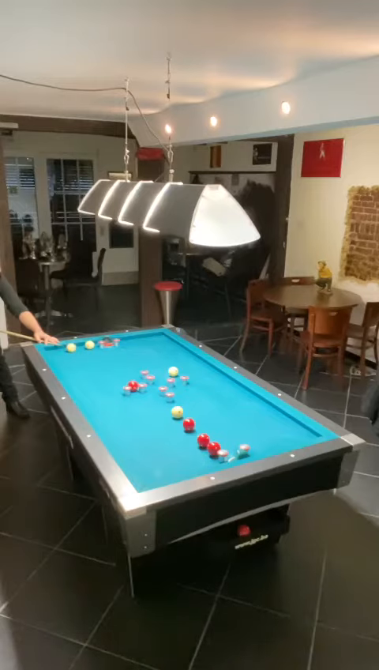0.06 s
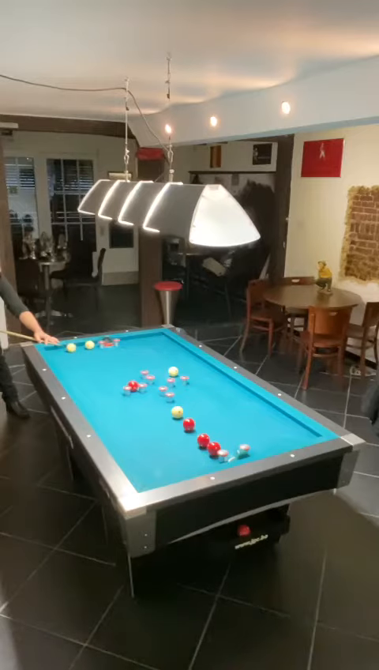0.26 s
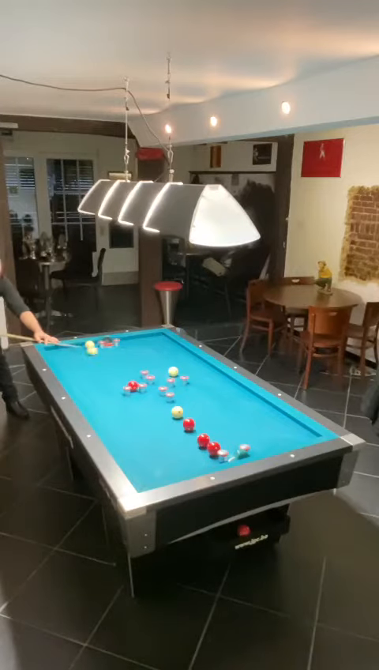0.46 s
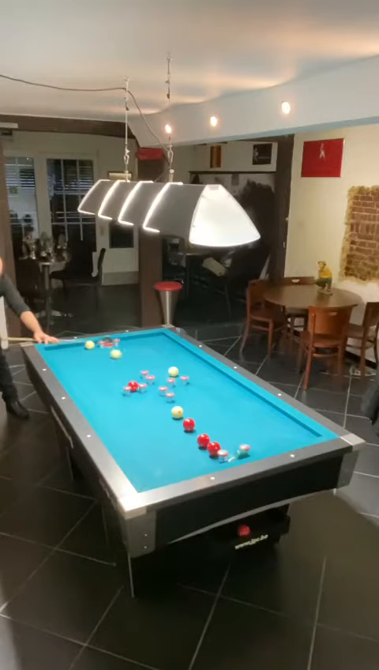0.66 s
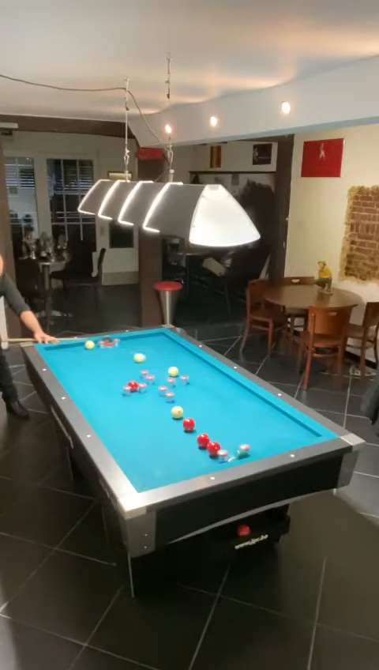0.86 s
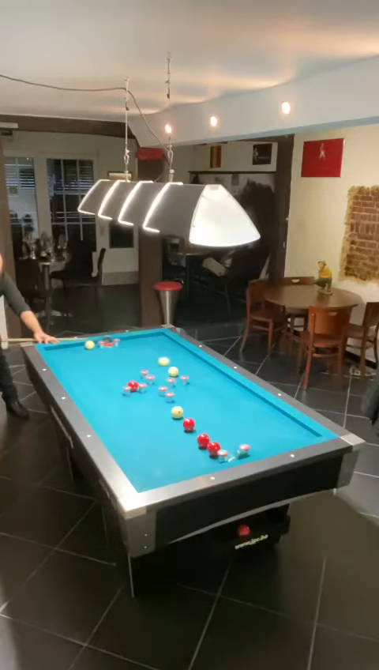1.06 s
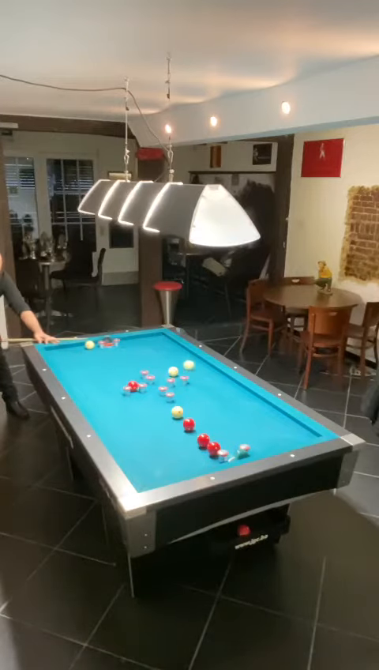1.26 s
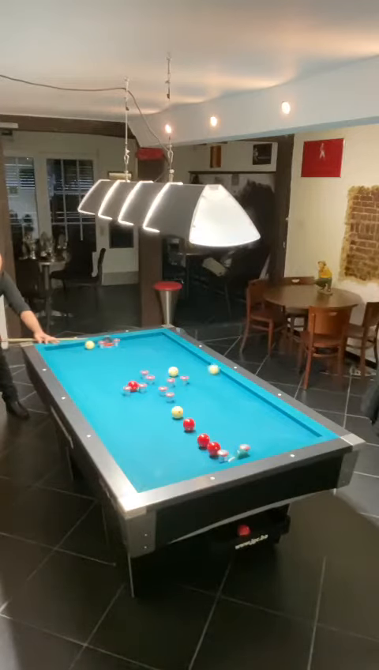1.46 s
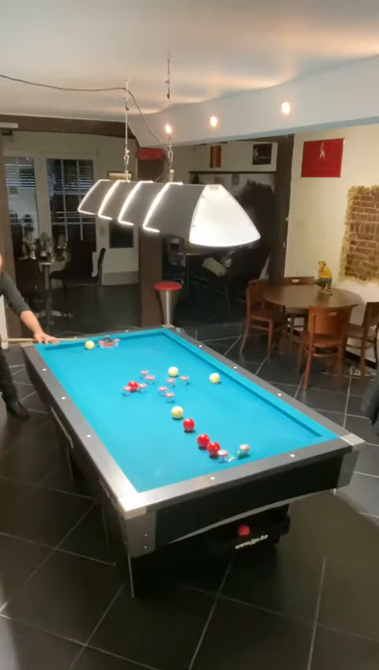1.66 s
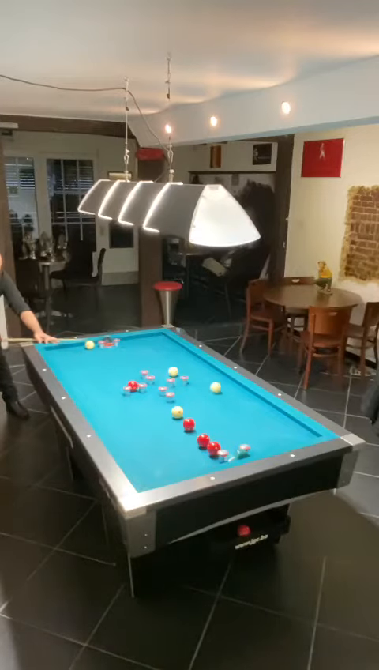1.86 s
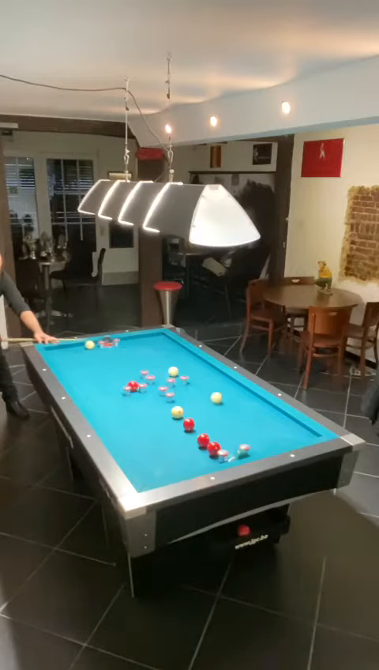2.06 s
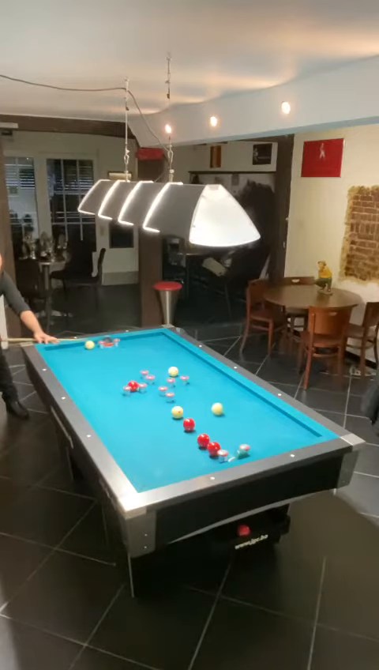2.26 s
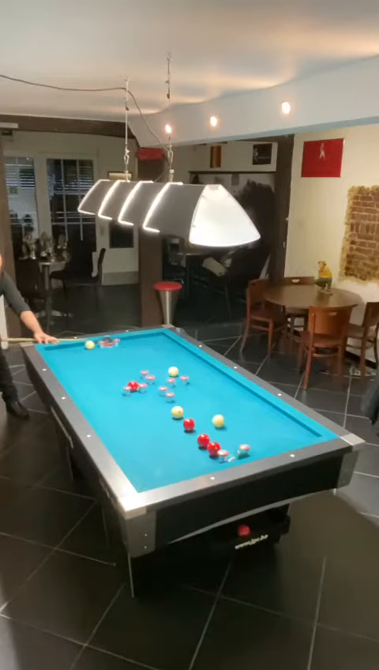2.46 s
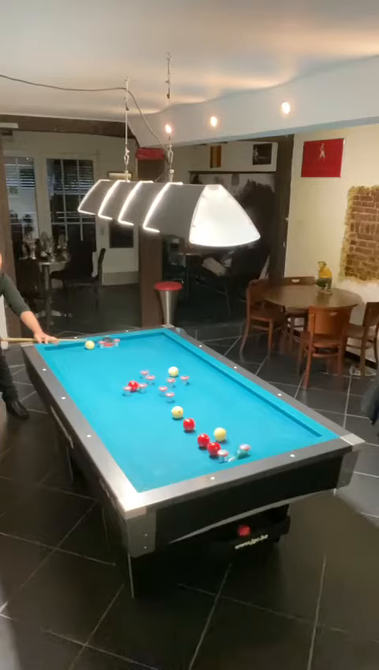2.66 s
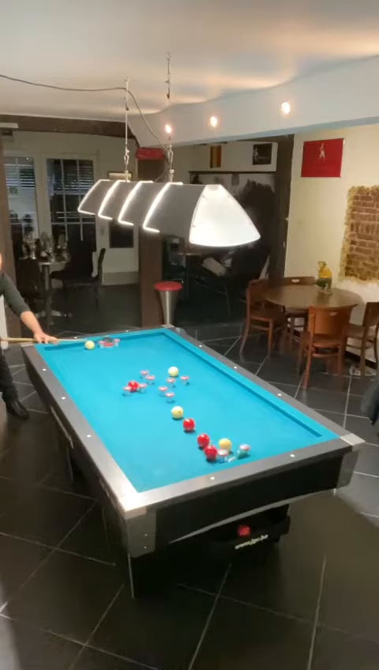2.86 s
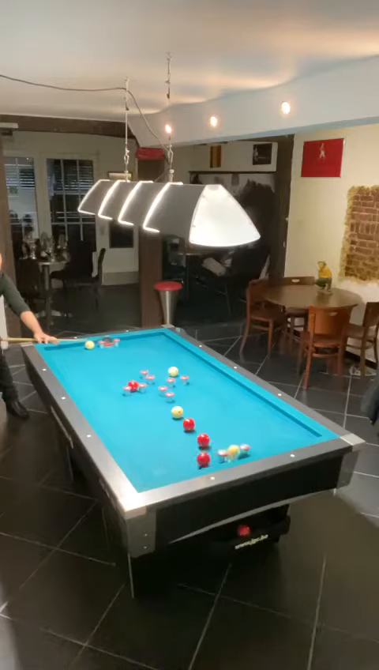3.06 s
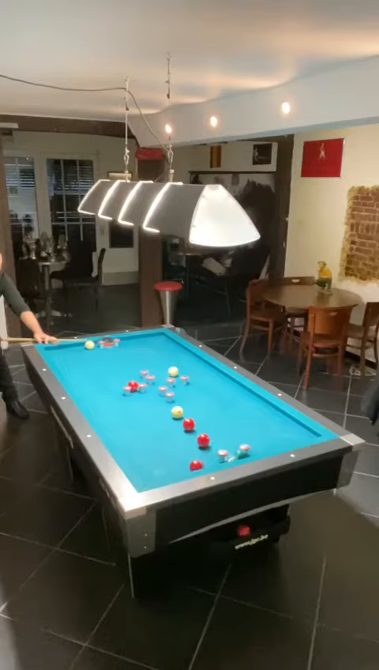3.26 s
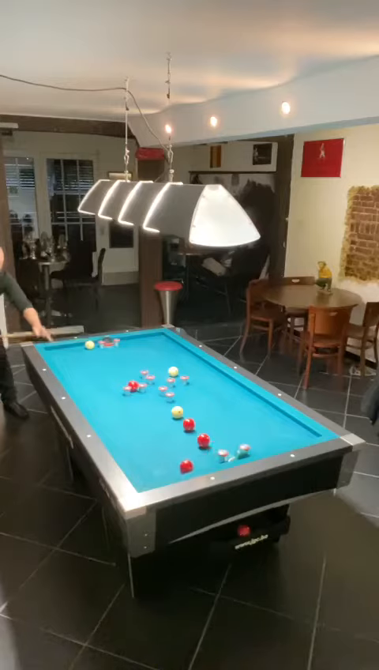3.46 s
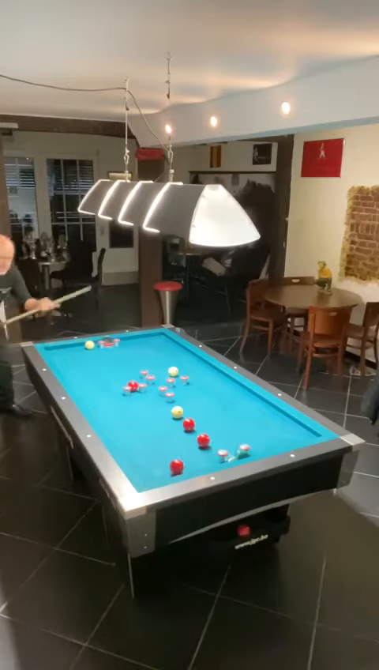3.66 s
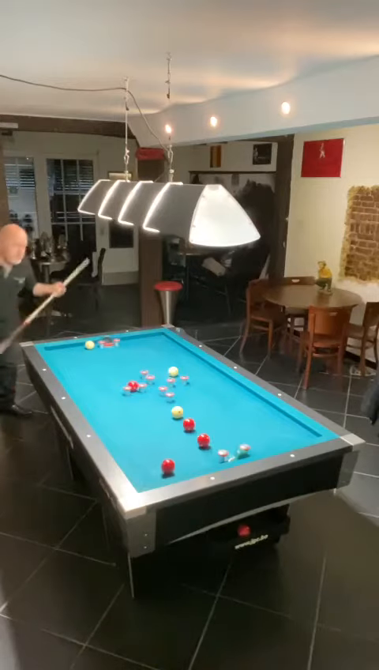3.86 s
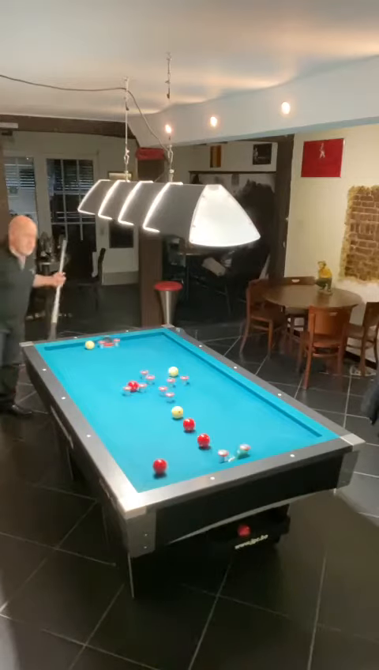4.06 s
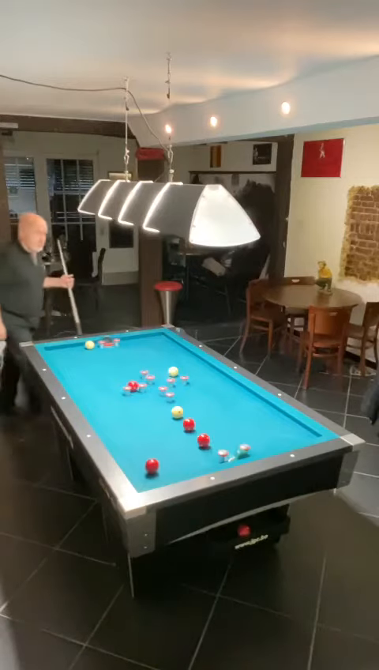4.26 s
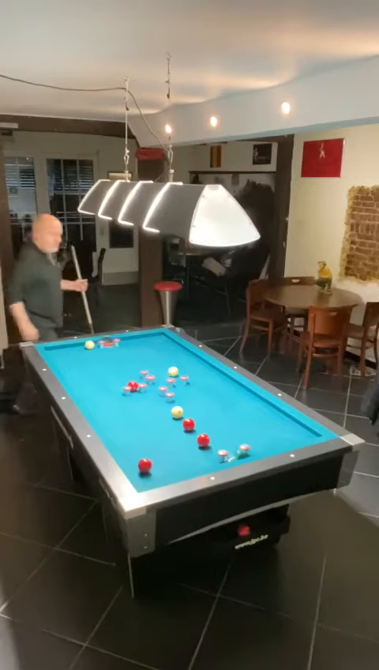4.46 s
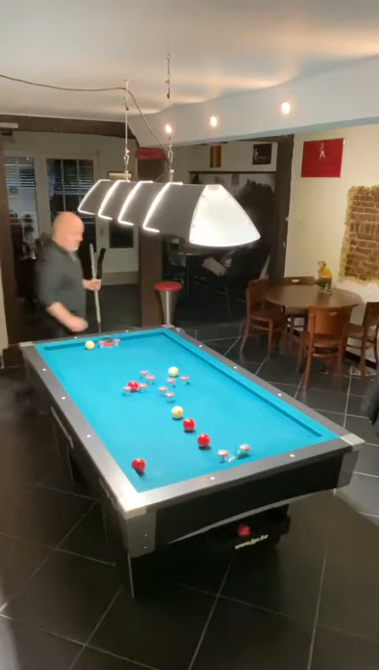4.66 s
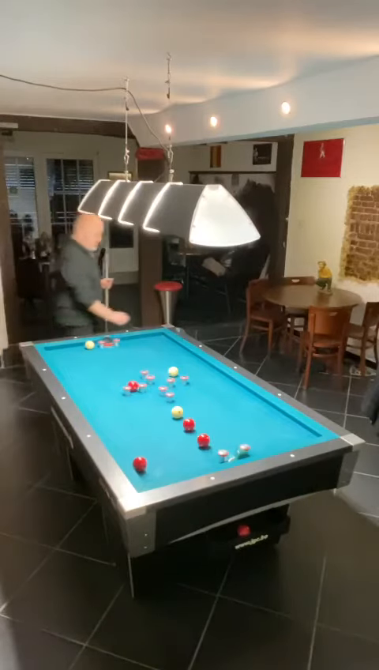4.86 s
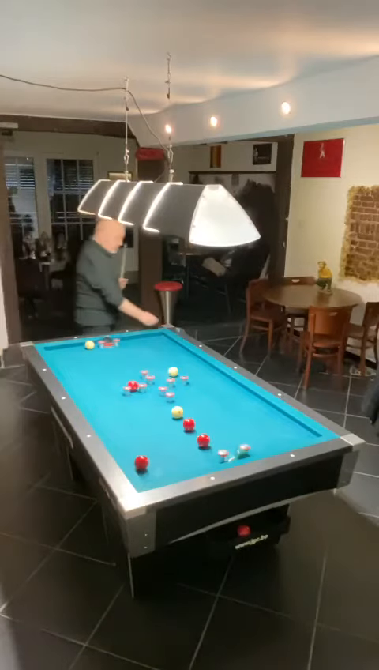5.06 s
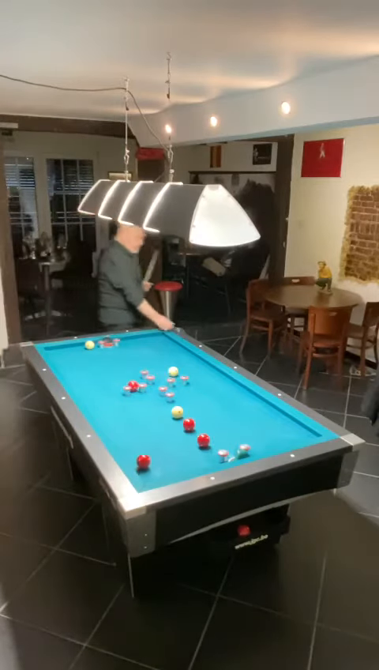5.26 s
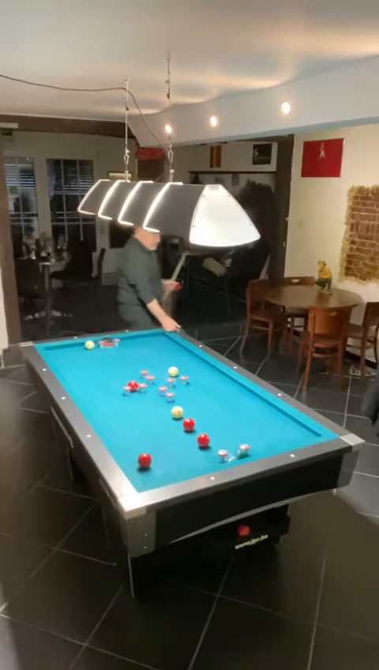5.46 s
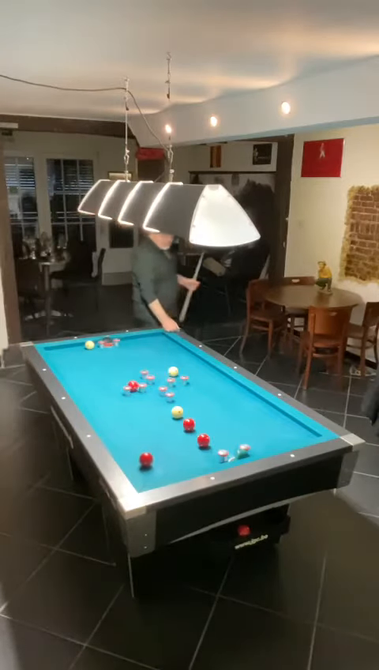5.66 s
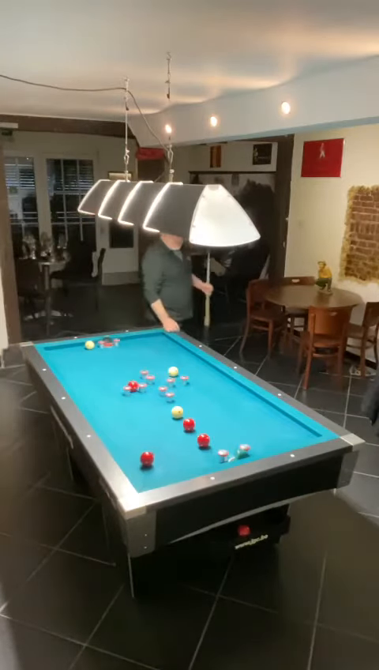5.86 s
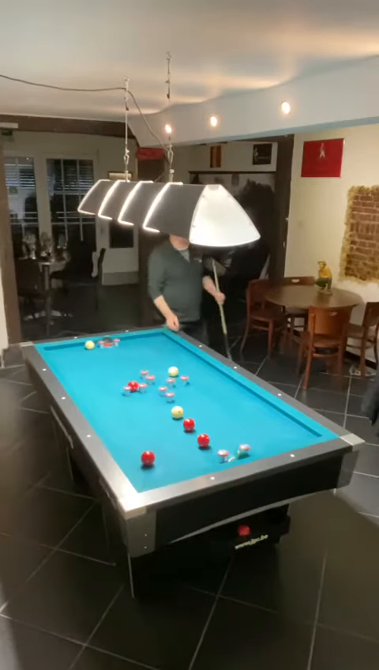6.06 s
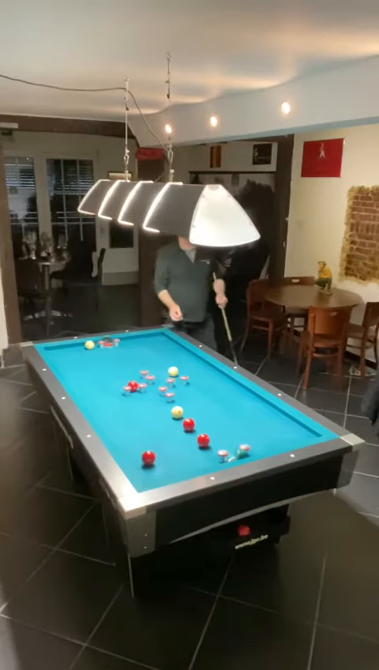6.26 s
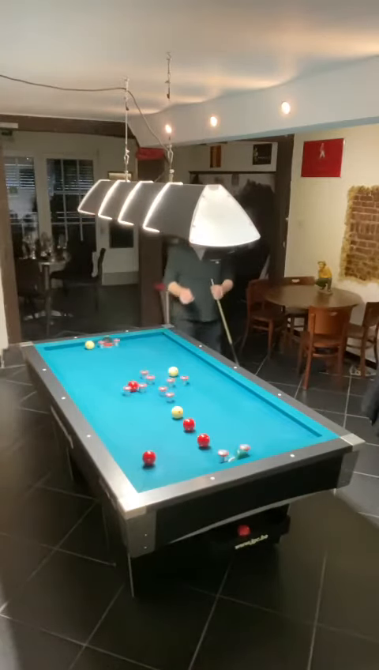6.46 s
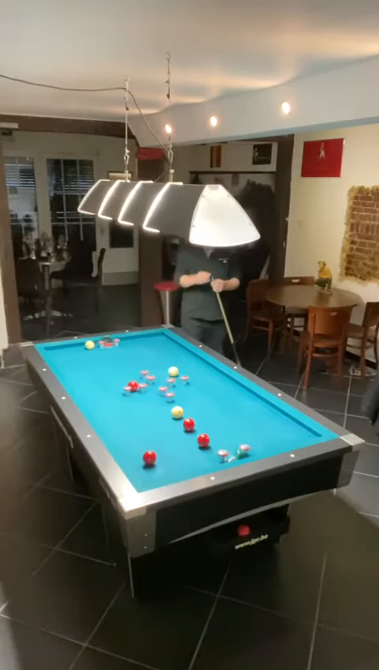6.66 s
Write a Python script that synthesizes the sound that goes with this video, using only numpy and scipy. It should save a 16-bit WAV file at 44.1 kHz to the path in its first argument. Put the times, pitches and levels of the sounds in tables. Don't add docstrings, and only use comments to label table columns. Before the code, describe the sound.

In a reverberant tiled room, a pool shot ends with a click, a pocket drop, a hollow wooden roll and a clattering tray collision.

```python
import sys
import numpy as np
from scipy import signal
from scipy.fft import rfft, irfft
from scipy.io import wavfile
from scipy.ndimage import uniform_filter1d

SR = 44100
rng = np.random.default_rng(int(sys.argv[2]) if len(sys.argv) > 2 else 0)


def wav_record(signal):
    frames = np.transpose(np.atleast_2d(signal))
    bounded = np.clip(frames, -1, 1)
    quanta = np.round(bounded * 32767).astype(np.int16)
    wavfile.write(sys.argv[1], SR, quanta)


def natural_amplitude(level_db):
    exponent = np.asarray(level_db, float) / 20
    return 10 ** exponent


N = 296219
JAW_S, DROP_S = 3.1315, 3.2572


def rms_one(x):
    return x / np.sqrt(np.mean(x ** 2) + 1e-20)


def in_time(rows):
    s, *columns = np.transpose(rows)
    return [np.interp(np.arange(N) / SR, s, column) for column in columns]


def at_hz(points, hz):
    table = np.array(points)
    return np.interp(np.log(hz), np.log(table[:, 0]), table[:, 1])


def drift(rate):
    step = 40
    r = np.exp(-2 * step * np.pi * rate / SR)
    white = rng.standard_normal(N // step + 2002)
    slow = signal.lfilter([1], [1, -2 * r, r * r], white)[2000:]
    return np.interp(np.arange(N) / step, np.arange(len(slow)), rms_one(slow))


def strikes(events, spread_db=0.):
    rows, out = np.array(events), np.zeros(N)
    out[np.round(rows[:, 0] * SR).astype(int)] = natural_amplitude(rows[:, 1] + spread_db)
    return out


def swells(rows, rise_s, fall_db_per_s, hold_s=0.):
    t, out = np.arange(N) / SR, 0
    for (s, db, *_), rise in zip(rows, np.broadcast_to(rise_s, len(rows))):
        climb_db = 40 * np.clip(s - t, 0, None) / rise
        decay_db = fall_db_per_s * np.clip(t - s - hold_s, 0, None)
        out = out + natural_amplitude(db - climb_db - decay_db)
    return out


def ring(x, hz, t60):
    r, w = natural_amplitude(-60 / (t60 * SR)), 2 * np.pi * hz / SR
    return signal.lfilter([0, np.sin(w)], [1, -2 * r * np.cos(w), r * r], x + 1e-18)


def coloured(x, spectrum):
    size = 8192
    level = at_hz(spectrum, np.arange(size // 2 + 1) * SR / size + 1)
    cepstrum = irfft(np.maximum(level, -90) * np.log(10) / 20)
    cepstrum[1:size // 2] *= 2
    cepstrum[size // 2 + 1:] = 0
    pulse = irfft(np.exp(rfft(cepstrum)))[:size // 2]
    return signal.fftconvolve(x, pulse / np.abs(pulse).max())[:N]


def bumps(per_s, uneven_db):
    unevenness = np.minimum(rng.exponential(1, N), 5)
    sizes = natural_amplitude(uneven_db * unevenness) * rng.choice([-1, 1], N)
    return rms_one(sizes * (rng.random(N) < per_s / SR))


# f/Hz, correlation/1
LIKENESS = [(300, 1), (500, 0.69), (1000, 0.45), (2000, -0.044), (4000, -0.17), (8000, 1), (11000, -0.54)]
# f/Hz, left minus right level/dB
BALANCE_DB = [(250, 0), (500, 1.6), (1000, 1.7), (2000, .3), (10000, .3)]


def bands(length, gain):
    out, edges = 0, 22 * 2 ** np.arange(0, 9.6, .5)
    white = rng.standard_normal((2, 2, length))
    opposite = np.array([[1], [-1]])
    for k, (low, high) in enumerate(zip(edges, edges[1:])):
        band = signal.butter(2, [low, high], "band", fs=SR, output="sos")
        mid, side = signal.sosfilt(band, white[k % 2])
        hz = np.sqrt(low * high)
        alike = np.clip(at_hz(LIKENESS, hz), -1, 1)
        lean = natural_amplitude(at_hz(BALANCE_DB, hz) / 2 * opposite)
        stereo = np.sqrt(1 + alike) * mid + np.sqrt(1 - alike) * side * opposite
        out = out + gain(hz) * lean * stereo
    return out


# f/Hz, T60/s
ROOM_T60 = [(60, 0.85), (200, 1.45), (500, 1.07), (1200, 1.07), (2500, 1.16), (5000, 0.81), (10000, 0.35)]
# t/s, level/dB
WALLS = [
    (0.0169, -3.5),
    (0.029, -9),
    (.048, -26),
]


def room(x, open_air):
    t = np.arange(round(1.5 * SR)) / SR
    tail = bands(len(t), lambda hz: natural_amplitude(-60 * t / at_hz(ROOM_T60, hz)))
    tail = natural_amplitude(-29.5) * tail * (1 - np.exp(-t / 0.00057))
    out = signal.fftconvolve((x + open_air)[None], tail, axes=1)[:, :N]
    for s, db in WALLS:
        delay = round(s * SR)
        out += natural_amplitude(db) * np.array([np.roll(open_air, delay), np.roll(open_air, delay + 6)])
    return out


# f/Hz, spectral density level/dB
AIR = [(76, -43.5), (130, -5.5), (258, -7), (295, -12.5), (379, -18), (409, -7.5), (482, -6.5), (662, -14),
       (722, -12), (795, -13), (1300, -22), (1690, -52.5), (2860, -120)]
# f/Hz, spectral density level/dB
HISS = [(700, -18.5), (1300, -6), (1900, -6), (2500, 0), (2900, -3), (3600, -9.5), (4300, -15), (4700, -19),
        (5000, -35.5), (8000, -29.5), (11000, -34)]
# f/Hz, spectral density level/dB
DEEP = [(12, -63.5), (20, -13), (48, 6.5), (103, 10.5), (130, -16.5), (150, 8), (200, -11), (330, -120)]
# t/s, level/dB
BOOMS = [
    (.36, -43.5),
    (.58, -50),
    (1.52, -53),
    (2.52, -60),
    (2.83, -54.5),
    (5.39, -39),
    (5.53, -45.5),
    (6.0, -52.5),
    (6.3, -70),
]


def ventilation():
    air_db, hiss_db, traffic_db = -54.5, -63.5, -62.5
    whine_hz, whine_db = 8330, -93
    t = np.arange(N) / SR
    on_cloth = 1. * (t > 0.22) * (t < 2.39)
    cloth = natural_amplitude(-57) * uniform_filter1d(on_cloth, size=4000)
    boom = natural_amplitude(traffic_db) + cloth + swells(BOOMS, 0.12, 78)
    air = [rms_one(coloured(rng.standard_normal(N), AIR)) for _ in range(2)]
    hiss = [rms_one(coloured(rng.standard_normal(N), HISS)) for _ in range(2)]
    mid = natural_amplitude(air_db + 0.4 * drift(6)) * air[0] + natural_amplitude(hiss_db) * hiss[0]
    side = natural_amplitude(air_db - 6.5) * air[1] + natural_amplitude(hiss_db + 1.5) * hiss[1]
    deep = boom * natural_amplitude(1.02 * drift(2.2)) * rms_one(coloured(rng.standard_normal(N), DEEP))
    whine = natural_amplitude(whine_db) * np.sin(2 * np.pi * whine_hz * t)
    return mid + side * [[1], [-1]] + deep + whine


# f/Hz, spectral density level/dB
SCUFF_COLOUR = [(1760, -42), (3000, 1), (4570, -6.5), (5320, -8.5), (5790, -7), (7850, -8), (10400, -15.5),
                (11500, -40.5), (15000, -57), (22000, -120)]
# t/s, level/dB, rise/s
SHUFFLE = [
    (5.62, -50.5, 0.053),
    (6.0, -88, 0.12),
    (6.37, -60.5, 0.26),
]


def scuffs():
    skid = swells([(DROP_S + 0.019, -38)], .02, 75)
    ball = skid + natural_amplitude(-37.5) * rolling()[0]
    walking = np.arange(N) / SR > SHUFFLE[0][0]
    player = swells(SHUFFLE, np.array(SHUFFLE)[:, 2], 79) + natural_amplitude(-75.5) * walking
    rub = bands(N, lambda hz: natural_amplitude(at_hz(SCUFF_COLOUR, hz)) * (hz > 2800))
    flutter = natural_amplitude(1.3 * drift(14))
    rub = signal.sosfilt(signal.butter(8, 10400, fs=SR, output="sos"), rub)
    return (ball + player) * natural_amplitude(3.0) * flutter * rms_one(rub)


# t/s, peak level/dB
CUE = [
    (0.2862, -21),
]
# f/Hz, level/dB, T60/s
CUE_MODES = [(501, -34, 0.9), (590, -28, 5.0), (743, -6, 2.2), (916, -10, 0.45), (1148, -3, 0.038),
             (1654, -10.5, 0.29), (2250, -12.5, 1.2), (2547, -8, 5.0)]
# f/Hz, spectral density level/dB
CUE_COLOUR = [(35, -30), (60, -19), (308, -9), (592, -6.5), (804, -13), (916, 0), (999, -12.5), (2340, -18),
              (2910, -30), (3320, -25.5), (11000, -53), (14300, -68), (22000, -120)]


def cue():
    blow = strikes(CUE)
    shaft = sum(natural_amplitude(db - 14.5) * ring(blow, hz, min(t60, .07)) for hz, db, t60 in CUE_MODES)
    return natural_amplitude(-4) * coloured(blow, CUE_COLOUR) + shaft


# t/s, peak level/dB
CUSHIONS = [
    (0.489, -49),
    (1.464, -35),
    (6.27, -47.5),
]
# f/Hz, spectral density level/dB
CUSHION_COLOUR = [(29, -37), (50, 6), (129, 6), (237, -3.5), (279, 3), (362, -1.5), (471, -4),
                  (1220, -25.5), (2500, -68), (3250, -50), (5500, -120)]


def cushions():
    return natural_amplitude(-1.0) * coloured(strikes(CUSHIONS), CUSHION_COLOUR)


# t/s, peak level/dB
CLICK = [
    (2.771, -16),
]
# f/Hz, level/dB
CLICK_RADIATION = [(300, -30), (560, -21), (800, -11), (1100, -8.5), (2000, 3.5), (2800, 5.5),
                   (3600, -16.5), (4300, -11.5), (6500, -15.5), (9000, -5), (11500, -12)]


def ball_click(blows):
    contact_s = .000455
    t = np.arange(round(.001 * SR)) / SR
    push = np.sin(np.pi * t / contact_s) * (t < contact_s)
    force = np.convolve(blows, push)[:N]
    return natural_amplitude(-8.5) * coloured(force, CLICK_RADIATION)


# t/s, level/dB, f/Hz, T60/s
FRAME_THUMP = (5, -19, 65.5, .5)


def frame_thump():
    s, db, hz, t60 = FRAME_THUMP
    blow = np.convolve(strikes([(s, db)]), np.hanning(600) / 300)[:N]
    return ring(blow, hz, t60)


# t/s, level/dB
CRASH = [
    (4.96, -11),
]
# t/s, level/dB
NUDGES = [
    (5.02, -20.5),
    (5.085, -34.5),
]
# f/Hz, spectral density level/dB
TRAY_COLOUR = [(40, -19), (65, 7.5), (150, 5), (300, -10.5), (600, 4.5), (1200, -6.5), (1700, -10.5),
               (2150, -1), (2800, -9), (4200, -15), (6000, -26.5), (10000, -30.5), (12000, -63)]
# f/Hz, level/dB, T60/s
TRAY_RING = [(2100, -30, 0.048), (712, -19, 0.061), (1251, -19, 0.039), (3950, -35.5, 0.044)]


def tray():
    level = swells(CRASH, 0.04, 411.5, 0.011) + swells(NUDGES, 0.0053, 240.0)
    force = level * natural_amplitude(-15.0) * bumps(4000, 2.5)
    plate = sum(natural_amplitude(db) * ring(force, hz, t60) for hz, db, t60 in TRAY_RING)
    return coloured(force, TRAY_COLOUR) + plate


# f/Hz, level/dB, T60/s
JAW_MODES = [(462, -7.5, 0.026), (735, -4, 0.024), (970, -3.5, 0.011)]
# f/Hz, level/dB, T60/s
DROP_MODES = [(390, -6, .16), (430, -17, .12), (275, -24, .09)]


def pocket():
    out = 0
    for s, strength_db, modes in (JAW_S, 3, JAW_MODES), (DROP_S, 6.0, DROP_MODES):
        blow = np.convolve(strikes([(s, strength_db)]), np.hanning(64) / 32)[:N]
        out = out + sum(natural_amplitude(db) * ring(blow, hz, t60) for hz, db, t60 in modes)
    return signal.sosfilt(signal.butter(4, 250, "high", fs=SR, output="sos"), out)


# t/s, pressure level on the wood/dB, hollowness level of the wood below/dB
RUN = [
    (3.14, -15.5, -24),
    (3.22, -28, -9),
    (3.27, -3, -14),
    (3.39, -18, -14),
    (3.49, -25.5, 2),
    (3.7, -23, -1),
    (3.85, -36, 14),
    (3.98, -30, 5),
    (4.17, -39, -10),
]
# t/s, pressure level on the wood/dB, hollowness level of the wood below/dB
RAMP = [
    (4.35, -34.5, 0.5),
    (4.42, -29.5, -3.5),
    (4.5, -33.5, -3.5),
    (4.68, -35, -12),
    (4.74, -34, 11.5),
    (4.811, -40.5, 0),
    (4.842, -20.5, 19),
    (4.92, -25.5, -15.5),
    (4.949, -23, -15.5),
]


def rolling():
    settle_s, settle_db_per_s = 1, 44
    end_s, end_db, end_hollow = RAMP[-1]
    rest = (end_s + settle_s, end_db - settle_db_per_s * settle_s, end_hollow + 8)
    level_db, hollow_db = in_time([*RUN, *RAMP, rest])
    t = np.arange(N) / SR
    moving = (t > RUN[0][0]) * (t < rest[0])
    pressure = moving * natural_amplitude(np.minimum(level_db, -15))
    return pressure, hollow_db, t > end_s


# t/s, ringing level/dB, crack level above it/dB, f of the panel struck/Hz,
# dead thud level above the ringing's reference/dB
KNOCKS = [(0.505, -22.5, -40, 367, -14), (1.463, -25.5, -42, 464, -9), (3.189, -7, -45.5, 590, -4),
          (3.301, -9, -11, 380, -10), (3.337, 0.5, -33, 452, -24), (3.389, -21, -27, 427, -13),
          (3.42, -17, -32, 573, 1), (3.459, -8.5, -55, 249, -15), (3.6, -17, -51.5, 427, -18.5),
          (4.143, -19, -50, 448, -15), (3.697, -9.5, -59, 418, -17), (3.876, -14.5, -52, 427, -8),
          (3.967, -15.5, -46, 154, -23), (4.006, -25, -63, 145, -12), (4.399, -8.5, -46, 133, -11),
          (4.453, -14, -41.5, 169, -15.5), (4.517, -30, -23, 162, -8), (4.719, -15.5, -46, 333, -10),
          (4.76, -19, -41, 172, -3), (4.83, -6, -52.5, 495, 2.5), (4.847, -8, -53, 457, -6),
          (4.864, 1, -60, 501, -17), (4.953, -5.5, -14.5, 330, -13.5), (5.378, -21, -52, 239, -12)]


def thuds(drive):
    thud_db = np.array(KNOCKS)[:, 4]
    blow = np.convolve(strikes(KNOCKS, thud_db + 4), np.hanning(30) / 4)[:N]
    return signal.sosfilt(signal.butter(3, [260, 900], "band", fs=SR, output="sos"), blow + drive)


# f/Hz, level/dB, T60/s
CABINET = [(64, -8, 0.27), (82, -5, 0.047), (99.2, -13, 0.065), (145, -7.5, 0.1), (165.6, -32.5, 0.33),
           (204.8, -11.5, 0.14), (259.7, -12.5, 0.16), (298.3, 0.5, 0.071), (324.5, 0.5, 0.081),
           (378.3, 7, 0.039), (433, 0, 0.099), (481, -2.5, 0.064), (614, -10.5, 0.015), (686, -12.5, 0.13),
           (898, -34.5, 0.09), (1335, -41, 0.01)]


def cabinet(frame_drive, box_drive, drive):
    out, luck = 0, rng.normal(0, 1, (len(KNOCKS), len(CABINET)))
    struck = np.array(KNOCKS)[:, 3]
    for k, (hz, db, t60) in enumerate(CABINET):
        share_db = 1.8 * luck[:, k] - 8 - 26 * np.abs(np.log2(hz / struck))
        knocks = np.convolve(strikes(KNOCKS, share_db), np.hanning(40) / 20)[:N]
        roll = frame_drive if hz < 115 else box_drive if hz < 220 else drive
        out = out + (-1) ** k * ring(knocks + natural_amplitude(db) * roll, hz, t60)
    return out


# f/Hz, spectral density level/dB
GRIT = [(400, -17.5), (800, -3.5), (1200, 0.5), (1700, -6), (2300, -7.5), (3000, -13), (4200, -14),
        (6000, -33.5), (10000, -46.5)]


def channel():
    pressure, box_db, in_tray = rolling()
    frame_db = np.where(in_tray, -4, -9.5 + .7 * box_db)
    force = pressure * natural_amplitude(1.42 * drift(19.0))
    slow, quick = force * bumps(300, 2.2), force * bumps(800, 1.12)
    panels = cabinet(slow * natural_amplitude(frame_db - 32.5), slow * natural_amplitude(box_db - 25.5), quick * natural_amplitude(-36.0))

    grain = bumps(3000, 2)
    skid = swells([(DROP_S + .012, -21.5)], 0.013, 84.5)
    grinding = force * natural_amplitude(np.where(in_tray, 4, -17.5)) + skid
    grit = grinding * natural_amplitude(-10.0) * rms_one(coloured(grain, GRIT))

    snaps = [(JAW_S, -44), (DROP_S, -27)]
    snaps += [(s, db + crack_db - 7.0) for s, db, crack_db, _, _ in KNOCKS]
    burst = rng.standard_normal(900) * np.exp(-np.arange(900) / (.005 * SR))
    treble = signal.butter(2, [2300, 10000], "band", fs=SR, output="sos")
    crack = signal.sosfilt(treble, np.convolve(strikes(snaps), burst)[:N])
    return panels + thuds(quick * natural_amplitude(1.5)) + grit + crack


def scene():
    far, click, near = cue() + cushions(), ball_click(strikes(CLICK)), pocket()
    thin = signal.butter(4, 58, "high", fs=SR, output="sos")
    under, jostle = signal.sosfilt(thin, [channel(), tray() + frame_thump()])
    direct = natural_amplitude(-4.0) * far + natural_amplitude(5.5) * click + natural_amplitude(2.5) * under + natural_amplitude(3.5) * jostle + natural_amplitude(2.5) * near
    above = natural_amplitude(7.5) * far + natural_amplitude(6) * click
    below = natural_amplitude(-6.5) * under + natural_amplitude(-3.5) * jostle + natural_amplitude(-11) * near
    return direct + room(below, above) + scuffs() + ventilation()


def top_cut(x):
    return signal.sosfilt(signal.butter(12, 12640, fs=SR, output="sos"), x)


def record(dry):
    mid, side = (dry[0] + dry[1]) / 2, (dry[0] - dry[1]) / 2
    side = signal.sosfilt(signal.butter(3, 380, "high", fs=SR, output="sos"), side)
    both = np.array([mid + side, mid - side])
    dip_hz, dip_width_hz, dip_share = 3200, 900, .5
    both = both - dip_share * signal.lfilter(*signal.iirpeak(dip_hz, dip_hz / dip_width_hz, SR), both)
    both = both / (1 + (both / 1.02) ** 4) ** .25
    both = signal.sosfilt(signal.cheby2(8, 45, 12300, fs=SR, output="sos"), both)
    return top_cut(both)


dry = scene()
out = record(dry)
wav_record(out)
```